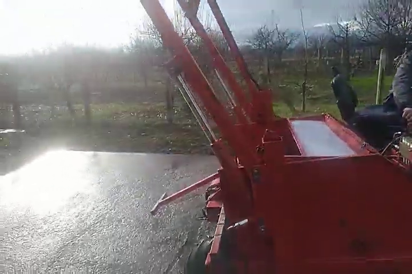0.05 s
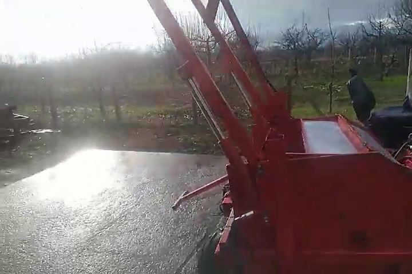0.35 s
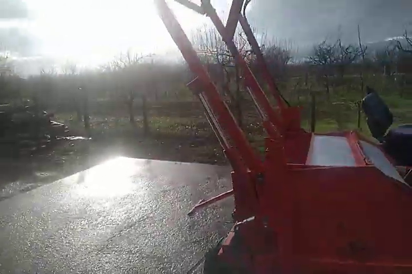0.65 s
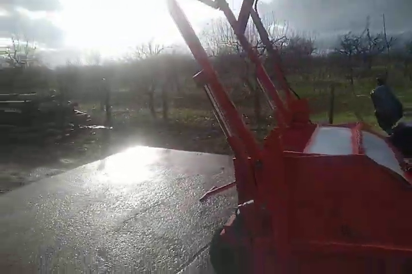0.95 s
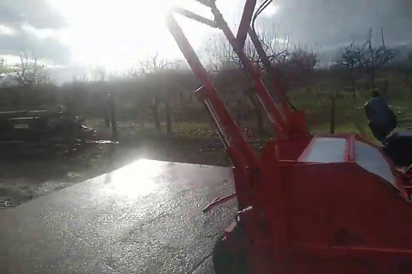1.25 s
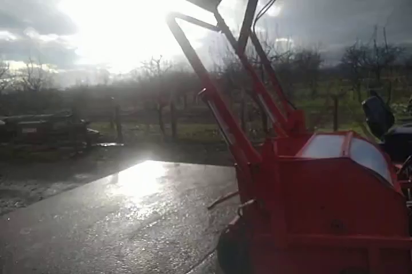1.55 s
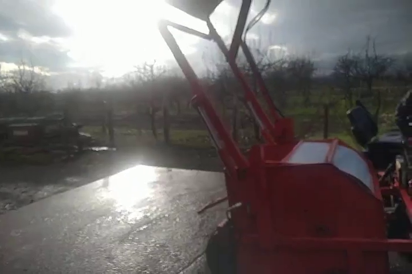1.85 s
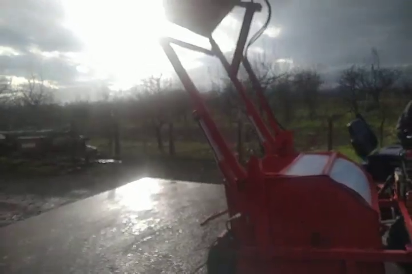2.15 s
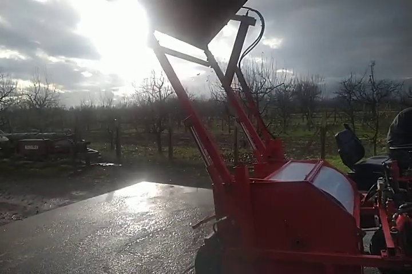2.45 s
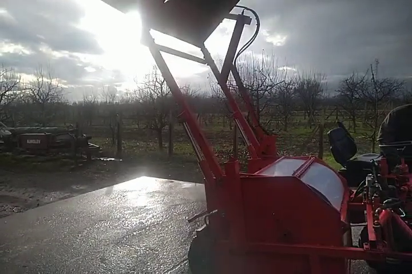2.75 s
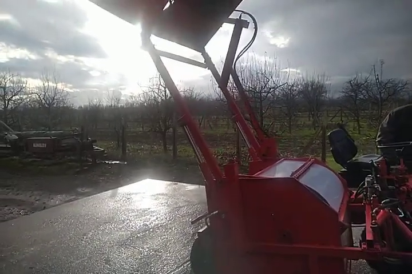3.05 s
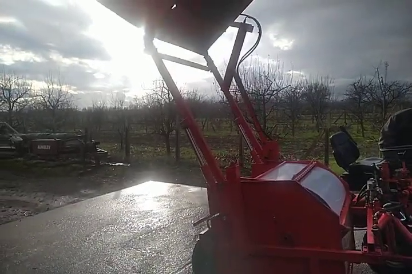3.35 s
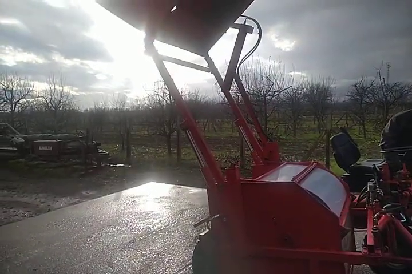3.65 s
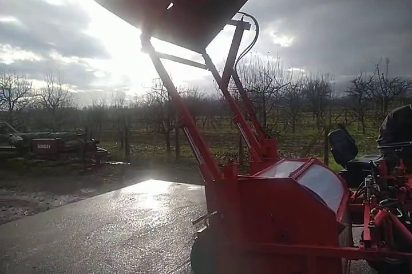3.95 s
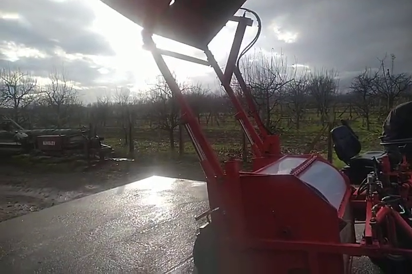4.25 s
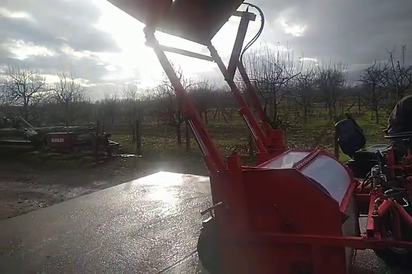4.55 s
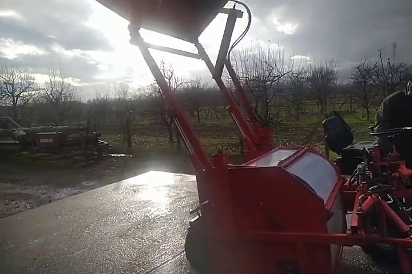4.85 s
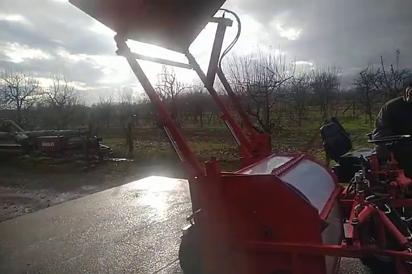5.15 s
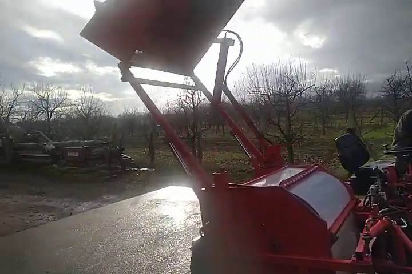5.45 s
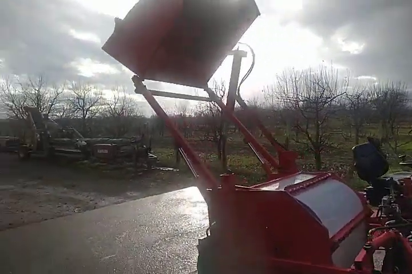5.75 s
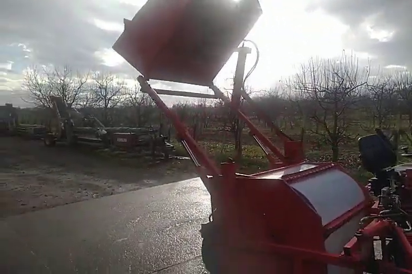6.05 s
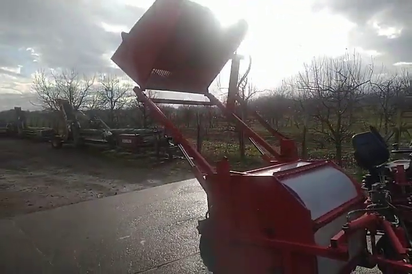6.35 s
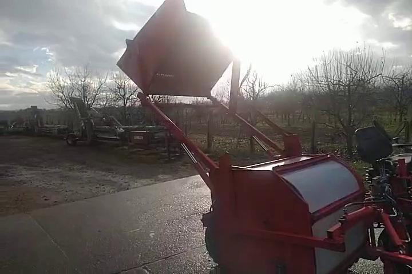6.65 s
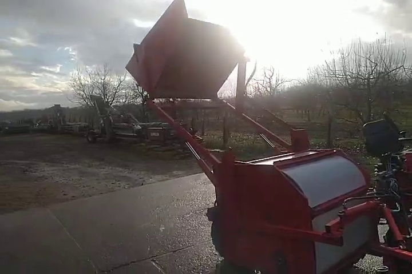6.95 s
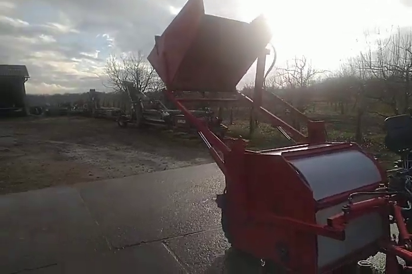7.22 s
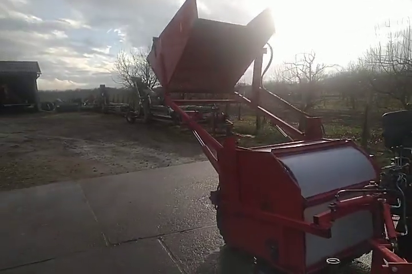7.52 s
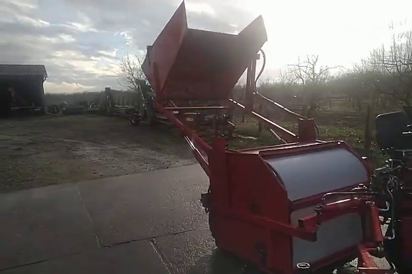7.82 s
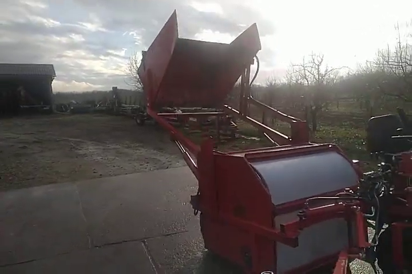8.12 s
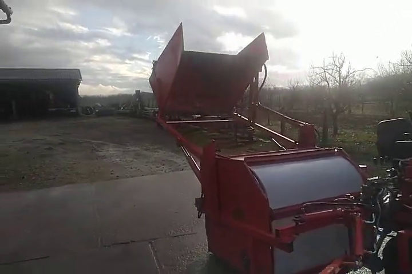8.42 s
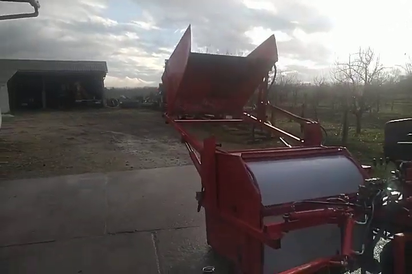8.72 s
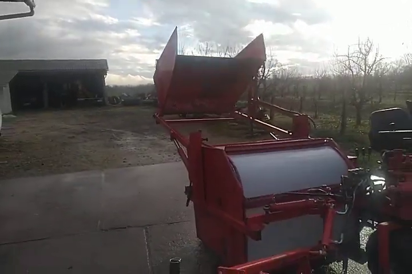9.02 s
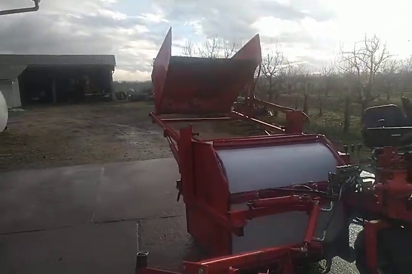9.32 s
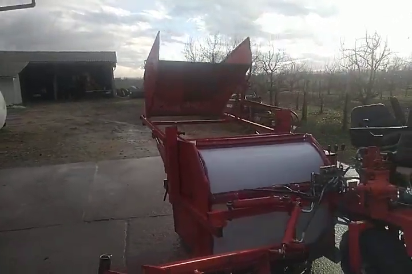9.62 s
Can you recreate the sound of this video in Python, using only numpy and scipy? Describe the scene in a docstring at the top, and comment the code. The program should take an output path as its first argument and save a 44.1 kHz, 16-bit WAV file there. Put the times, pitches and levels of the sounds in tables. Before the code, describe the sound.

A diesel farm machine runs close by on an open concrete yard for the whole ten seconds, heard on a slow walk around it. The exhaust gives a low, even throb. Over it the sheet-metal housing drones, clatters and rings from engine knocks and the brush roller, and a conveyor chain rattles densely. A faint, ragged hydraulic whine swells and fades above a thin, high hiss of oil. At about 3 seconds a few short, hissy spurts come from the valves, the engine sags slightly and the whine grows louder; the speed recovers by 4 seconds. Light wind rumbles on the microphone from about 3.5 seconds, most clearly between 5.5 and 7 seconds and more on the right. The engine tone shifts gently as the listener moves. From about 9.3 seconds another high oil hiss swells while the machine keeps running.

```python
"""A diesel pickup machine runs on a concrete yard and lowers its hopper, heard on a slow walk round it.
The exhaust throbs with two strong puffs in each engine cycle. Engine knocks and the brush roller shake
the sheet-metal housing, and the conveyor chain rattles. The hydraulic pump whines, and oil hisses and
spurts in the valves. Now and then a light gust rumbles on the left and right microphones."""
import sys
import numpy as np
from scipy import signal
from scipy.fft import rfft, irfft
from scipy.io import wavfile
from scipy.ndimage import uniform_filter1d

SR = 44100
rng = np.random.default_rng(int(sys.argv[2]) if len(sys.argv) > 2 else 0)


def wav_out(sig):
    """Save sig, one row per channel (or a flat mono array), as 16-bit PCM at SR to the path in sys.argv[1]."""
    wavfile.write(sys.argv[1], SR, np.round(np.clip(np.atleast_2d(sig).T, -1, 1) * 32767).astype(np.int16))


N = 435708
TIME = np.arange(N) / SR
FREQ = np.maximum(np.fft.rfftfreq(N, 1 / SR), 1)

# Engine speed, which sags under hydraulic load. Each row: time in seconds, engine cycles per second.
ENGINE_SPEED = [(0.0, 19.304), (0.1, 19.144), (0.3, 19.299), (0.5, 19.155), (1.1, 19.423), (1.2, 19.37),
                (1.9, 19.644), (2.4, 19.44), (2.6, 19.078), (2.9, 19.22), (3.2, 18.506), (3.3, 18.57),
                (3.6, 19.243), (3.9, 19.597), (4.9, 19.624), (5.1, 19.358), (5.7, 19.232), (6.0, 19.294),
                (6.3, 19.225), (6.8, 19.363), (7.2, 19.757), (7.5, 19.441), (7.7, 19.386), (8.1, 19.532),
                (8.5, 19.496), (8.7, 19.411), (9.4, 19.236), (9.88, 19.314)]
# The exhaust's tones. Each row: multiple of the engine speed, starting level in dB, fade in dB per second.
EXHAUST_TONES = [(2, -57, 1), (3, -48.5, -0.2), (4, -45, 1), (5, -28.5, 0.16), (6, -26.5, 0.11),
                 (7, -40.5, 0), (8, -31, 0), (9, -30, 0.83), (11, -36, 0.3), (12, -35.5, 1.3),
                 (13, -34.5, 3), (14, -59, 8), (16, -47.5, 0.5), (17, -50, 1.5), (19, -57, -0.8),
                 (21, -52.5, 0.54)]
# Spots on the walk where echoes from the yard weaken one tone.
# Each row: multiple of the engine speed, middle in seconds, half-length in seconds, depth in dB.
QUIET_SPOTS = [(6, 0.22, 1.5, 4), (8, 0.59, 0.95, 4.5), (9, 1.76, 0.54, 5), (5, 3.23, 0.4, 7.5),
               (7, 3.8, 0.94, 3.5), (5, 4.7, 2.16, 3), (13, 6.6, 0.64, 2), (11, 6.26, 1.55, 10),
               (12, 8.6, 0.51, 3.5), (8, 8.35, 0.92, 5.5), (6, 8.36, 1.03, 11.5), (5, 10.54, 0.74, 8),
               (9, 10.2, 0.46, 5)]
# The second puff's pull on the tones' timing. Each row: time in seconds, weight (the first puff is 1).
SECOND_PUFF = [(0, .2), (3, .98), (7, .95), (8.8, .07), (9.88, 0)]
# Resonances of the silencer and tailpipe. Each row: pitch in Hz, width in Hz, relative strength.
PIPE_MODES = [(94, 20, 1), (157, 8, .17), (231.4, 8, 3)]
# The phone's body shields its right microphone from the higher exhaust tones.
# Each row: multiple of the engine speed, left level minus right level in dB.
SHADE = [(6, 0.5), (9, 3.5), (12, 3.5), (16, 8.5)]
# The housing's low drone. Each row: frequency in Hz, then left and right relative levels in dB.
DRONE_COLOUR = [(20, -82, -80), (33, -75, -80), (44.3, -72, -60), (75.4, -55, -55.5), (139, -57.5, -74),
                (204, -59.5, -58), (296, -61, -65.5), (396, -62.5, -74), (509, -70.5, -77),
                (820, -150, -153)]
# The housing's brighter clatter. Each row: frequency in Hz, then left and right relative levels in dB.
CLATTER_COLOUR = [(294, -82, -88), (479, -67.5, -68), (534, -62.5, -65), (730, -62, -65.5),
                  (800, -61.5, -73), (875, -63, -66.5), (1000, -64, -79), (1130, -66, -71),
                  (1297, -71, -75.5), (1610, -80, -79.5), (2500, -105, -105)]
# Knocks of burning fuel. Each row: place in the cycle from 0 to 1, level in dB against the steady shaking.
FIRING_KNOCKS = [(0.19, -5), (.36, -8), (.56, -15), (0.82, -15)]
# The notes of the steel panels. Each row: pitch in Hz, width in Hz, relative level in dB.
PANEL_MODES = [(306.3, 69, -53), (411, 20.5, -58.5), (452.6, 16, -63), (640.5, 50, -56.5), (775, 26, -53),
               (858, 37, -51), (926.6, 31, -52), (980.6, 45, -50.5), (1088, 27, -53.5), (1155, 28, -58.5)]
# How the panels and the pump's main whine vary along the walk. Each row: time in seconds, gain in dB.
WALK_LEVEL = [(0, -0.5), (1.5, 1.5), (2.2, 0.5), (2.8, -1), (3.5, -3), (4.2, 4.5), (5.6, 0), (8.3, 4),
              (9.88, -0.5)]
# Brief ringing swells: low ones from the panels, those near 1830 and 2250 Hz the pump's higher whine.
# Each row: middle in seconds, half-length in seconds, pitch in Hz, width in Hz, relative level in dB.
RINGING_SWELLS = [(0.747, 0.28, 309, 70, -42), (.9, 0.97, 830, 170, -46.5), (1.112, 1.3, 1410, 200, -55),
                  (.9, 1.5, 2830, 240, -55.5), (.4, 0.77, 1855, 70, -55), (2.1, 0.49, 1835, 70, -57),
                  (3.05, .17, 2210, 90, -58), (3.8, .2, 1835, 70, -55), (4.1, 1, 493, 70, -50.5),
                  (4.15, 0.66, 3000, 600, -55), (5.2, .2, 870, 50, -50), (5.75, 0.85, 373, 110, -43),
                  (6.15, .33, 1817, 60, -52), (6.9, .7, 1730, 120, -53), (9.002, .14, 2275, 60, -55),
                  (9.42, .18, 2270, 60, -52)]
# The chain's rattle. Each row: frequency in Hz, then left and right relative levels in dB.
CHAIN_COLOUR = [(920, -99, -100), (1310, -73, -76.5), (1530, -76, -81), (1700, -71.5, -80),
                (1900, -74, -81), (2110, -71.5, -79.5), (2650, -75, -80.5), (2830, -75.5, -78),
                (3810, -81.5, -78.5), (4030, -87, -83), (5500, -110, -110)]
# The notes of the conveyor's guard. Each row: pitch in Hz, width in Hz, relative starting level in dB.
GUARD_MODES = [(1734, 100, -63.5), (1940, 50, -67), (2070, 66, -67), (2253, 100, -66)]
# The oil's hiss. Each row: frequency in Hz, then left and right relative levels in dB.
HISS_COLOUR = [(3000, -105, -100), (4120, -99, -94.5), (4240, -90.5, -80.5), (5110, -86, -78),
               (5700, -84.5, -75.5), (6280, -89, -78.5), (7090, -81, -83.5), (7640, -93, -89.5),
               (8560, -86.5, -99), (9170, -87.5, -100), (10260, -103, -104), (11500, -113, -113),
               (14400, -106, -106), (14800, -116, -107)]
# How the hiss varies along the walk; the chain partly follows. Each row: time in seconds, gain in dB.
TREBLE_LEVEL = [(0, 0.1), (2.3, -0.5), (3.6, -0.9), (4.5, .3), (5.2, -2), (8.2, .7), (9.88, 1)]
# Brief dips in that level. Each row: middle in seconds, half-length in seconds, depth in dB.
TREBLE_DIPS = [(2.63, 0.21, 2.5), (3.42, 0.11, 1), (5.792, 0.087, 2)]
# Spells when the pump also sings higher.
# Each row: middle in seconds, half-length in seconds, multiple of the whine's pitch, relative level in dB.
PUMP_SPELLS = [(0.793, 0.55, 2, -58), (1.75, 0.3, 2, -62), (2.0, 0.65, 1.5, -67), (2.35, .2, 2, -58),
               (3.3, 0.5, 2.5, -65), (3.85, 0.32, 2, -59), (4.528, .14, 2, -57), (6.2, 0.5, 2, -62),
               (9.4, .55, 2.5, -65)]
# Spurts of oil. Each row: middle in seconds, half-length in seconds, level on the right in dB.
SPURTS = [(2.94, .06, -44.5), (3.06, .05, -46), (3.15, .04, -49), (3.2, .028, -45), (9.7, 0.41, -51)]
# The spurts' high, thin sound. Each row: frequency in Hz, relative level in dB.
SPURT_COLOUR = [(4000, -32), (5200, -12), (5550, 8), (6300, 1), (7000, -2), (7700, -22), (12000, -32)]
# Gusts of wind. Each row: middle in seconds, half-length in seconds, left level in dB, right level in dB.
GUSTS = [(3.6, 0.07, -37, -38), (4.55, 0.09, -43, -40), (4.89, 0.04, -34, -36), (5.68, 0.05, -39, -24),
         (5.81, 0.055, -41, -20.5), (6.067, 0.025, -34, -28), (6.473, 0.046, -46, -32),
         (6.66, 0.06, -44, -32), (6.84, 0.065, -31, -27), (6.5, 1.2, -39, -37)]
# The gusts' low rumble. Each row: frequency in Hz, relative level in dB.
GUST_COLOUR = [(20, -28), (55, 6.5), (110, 6.5), (250, -6.5), (700, -23.5), (3000, -59), (12000, -101)]
# How alike the two microphones sound. Each row: frequency in Hz, likeness from 0 (unrelated) to 1.
LIKENESS = [(30, 0), (100, 0), (300, 0.91), (650, 1), (1100, 0.75), (2000, 0.18), (5000, 0), (15000, 0.44)]

PUFF_PLACES = (.375, .749)  # where the two puffs fall in the cycle, from 0 to 1
PAN_DB = np.array([[2.75], [-2.75]])  # left, then right, for the panels and the swells


def undb(db):
    """Turn decibels into a number to multiply by."""
    return 10 ** (np.asarray(db) / 20)


def unit(x):
    """Scale a signal so its average strength (rms) is 1."""
    return x / np.sqrt(np.mean(x ** 2))


def curve(table):
    """Join a table's points with straight lines over time."""
    return np.interp(TIME, *np.transpose(table))


def spectra(table):
    """Join each column's points with straight lines over log frequency."""
    hz, *columns = np.transpose(table)
    return np.array([np.interp(np.log(FREQ), np.log(hz), c) for c in columns])


def wander(rate):
    """A random drift of size about 1, with `rate` new values a second."""
    return unit(np.interp(TIME * rate, np.arange(4096), rng.standard_normal(4096)))


def bump(s, half_s):
    """A smooth rise and fall around second `s`."""
    return np.exp(-((TIME - s) / half_s) ** 2)


def surge(cycle, depth_db, place, repeats):
    """A swing in level that comes `repeats` times in each engine cycle."""
    return undb(depth_db * np.cos(2 * np.pi * repeats * (cycle - place)))


def resonance(hz, width_hz):
    """A filter that rings at one pitch and keeps white noise equally strong."""
    return np.sqrt(2 * SR / (np.pi * width_hz)) / (1 + 2j * (FREQ - hz) / width_hz) ** 2


def noise(response):
    """Separate left and right noise, shaped by a filter."""
    return irfft(rfft(rng.standard_normal((2, N))) * response, N)


def microphones(pair, left_lag_s=0.00023):
    """Blend two signals into left and right spectra; the machine stands to the right."""
    a, b = rfft(pair)
    alike = np.clip(spectra(LIKENESS)[0], 0, 1)
    left = a * np.exp(-2j * np.pi * FREQ * left_lag_s)
    right = alike * a + np.sqrt(1 - alike ** 2) * b
    return np.array([left, right])


def radiate(pair, colour):
    """Give two signals a tone colour, as heard at the microphones."""
    return irfft(microphones(pair) * undb(spectra(colour)) * np.sqrt(SR / 2), N)


def ring_metal(blows, modes):
    """Struck metal rings at its own pitches, whatever the engine speed."""
    response = sum(undb(db) * resonance(hz, width_hz) for hz, width_hz, db in modes)
    return irfft(microphones(blows) * response, N)


def ring_out(blows, fade_s):
    """Give each blow the noisy tail of steel, falling 60 dB in `fade_s`."""
    t = TIME[:8192]
    tail = rng.standard_normal(len(t)) * undb(-60 * t / fade_s)
    return unit(signal.fftconvolve(blows, tail)[:N])


def taps(times, sizes):
    """Clicks at the given times in seconds."""
    at = np.clip(times * SR, 0, N - 1).astype(int)
    return unit(np.bincount(at, sizes * (times > 0) * (at < N - 1), N))


def knocks(cycle, count, jitter_s, scatter_db):
    """Moving parts strike at `count` set places in each cycle; which ones stand out slowly drifts."""
    places = np.arange(int(cycle[-1]) + 1)[:, None] + rng.random(count)
    sizes = uniform_filter1d(rng.standard_normal(places.shape), size=30, axis=0)
    sizes /= np.sqrt(np.mean(sizes ** 2, axis=1, keepdims=True))
    times = np.interp(places, cycle, TIME) + jitter_s * rng.standard_normal(places.shape)
    sizes *= undb(scatter_db * rng.standard_normal(places.shape))
    return taps(times.ravel(), sizes.ravel())


def rattle(count, scatter_db):
    """Loose parts tap `count` times at random, a few much harder than the rest."""
    when, direction, force = rng.random((count, 3)).T
    sizes = np.sign(direction - .5) * undb(-scatter_db * np.log(1 - force))
    return taps(when * N / SR, sizes)


def pipe_phase(hz):
    """The silencer and tailpipe hold back tones near their resonances, so each puff rings on."""
    response = sum(gain / (1 + 2j * (hz - mode_hz) / width_hz) for mode_hz, width_hz, gain in PIPE_MODES)
    return np.angle(-response)


def exhaust(cycle):
    """Two unevenly spaced puffs make a throbbing stack of tones; echoes weaken one, then another."""
    second_weight = curve(SECOND_PUFF)
    crank = cycle + 0.002 * wander(30)
    mean_speed = cycle[-1] / TIME[-1]
    sound = np.zeros((2, N))
    for multiple, start_db, fade in EXHAUST_TONES:
        k = round(multiple)
        dips_db = sum(db * bump(s, half_s) for tone, s, half_s, db in QUIET_SPOTS if round(tone) == k)
        level_db = start_db - fade * TIME - dips_db
        first, second = np.exp(-2j * np.pi * k * np.array(PUFF_PLACES))
        phase = np.angle(first + second_weight * second) + pipe_phase(k * mean_speed)
        pan_db = np.interp(k, *np.transpose(SHADE)) * np.array([[.5], [-.5]])
        sound += undb(level_db + pan_db) * np.cos(2 * np.pi * k * crank + phase)
    return np.sqrt(2) * undb(0.17 * wander(40)) * sound


def firing(cycle, decay_cycles=0.042, scatter_db=4):
    """How hard the engine shakes: each knock of burning fuel jolts it and dies away, no two alike."""
    scatter = undb(scatter_db * rng.standard_normal((len(FIRING_KNOCKS), int(cycle[-1]) + 3)))
    jolts = 0
    for (place, db), sizes in zip(FIRING_KNOCKS, scatter):
        since, turn = np.modf(cycle + 1 - place)
        jolts = jolts + undb(db) * sizes[turn.astype(int)] * np.exp(-since / decay_cycles)
    return unit(1 + jolts)


def housing(cycle, drone_db, clatter_db):
    """Engine knocks and the brush roller's prongs make the sheet metal drone, clatter and ring."""
    jolts = firing(cycle)
    shaking = np.array([rattle(count=14000, scatter_db=1.5) for _ in range(2)]) * jolts
    blows = np.array([knocks(cycle, count=110, jitter_s=.00005, scatter_db=0) for _ in range(2)])
    prongs = np.array([rattle(count=30000, scatter_db=2) for _ in range(2)])
    strikes = unit((undb(-0.5) * blows + prongs) * jolts)
    drone = radiate(shaking, DRONE_COLOUR) * undb(drone_db)
    clatter = radiate(strikes, CLATTER_COLOUR) * undb(clatter_db)
    panels = ring_metal(shaking, PANEL_MODES) * undb(curve(WALK_LEVEL) + PAN_DB)
    return drone + clatter + panels


def ringing_swells(cycle):
    """Narrow bands of pulsing noise swell and fade: low panel notes and the pump's higher whine."""
    pulsing = microphones(rng.standard_normal((2, N)) * firing(cycle))
    sound = sum(irfft(pulsing * resonance(hz, width_hz), N) * undb(db) * bump(s, half_s)
                for s, half_s, hz, width_hz, db in RINGING_SWELLS)
    return sound * undb(PAN_DB)


def conveyor(cycle, gain_db):
    """Chain links tick over toothed wheels and loose slats tap, in a dense, ringing rattle."""
    links = np.array([ring_out(knocks(cycle, count=40, jitter_s=.0003, scatter_db=4), fade_s=0.17)
                      for _ in range(2)])
    slats = np.array([rattle(count=70000, scatter_db=1.44) for _ in range(2)])
    chain = radiate(unit(undb(-1.5) * links + slats), CHAIN_COLOUR)
    return chain * undb(gain_db + 0.25 * wander(35))


def conveyor_guard(rise_db_per_s=0.34):
    """Slats tap the thin guard, which rings louder as the listener comes round to it."""
    slats = np.array([rattle(count=2500, scatter_db=3) for _ in range(2)])
    return ring_metal(slats, GUARD_MODES) * undb(rise_db_per_s * TIME + np.array([[3], [-3]]))


def oil_hiss(cycle, gain_db):
    """Oil hisses through the valves, pulsing slightly as the engine turns."""
    pulse = surge(cycle, depth_db=0.46, place=0.36, repeats=2)
    pulse *= surge(cycle, depth_db=0.7, place=0.21, repeats=3)
    flow = rng.standard_normal((2, N)) * pulse * undb(0.85 * wander(45))
    return radiate(flow, HISS_COLOUR) * undb(gain_db)


def valve_ring(fade_db_per_s=1.5):
    """Flowing oil makes the valve block ring thinly, mostly on the right, fading along the walk."""
    ringing = noise(resonance(hz=5530, width_hz=240))
    level_db = -50.5 - fade_db_per_s * TIME + 1.5 * wander(6.2)
    return ringing * undb(level_db + np.array([[-6], [0]]))


def pump(cycle, speed, teeth_per_cycle=47.3, labour_below_hz=18.76, lag_s=0.1):
    """The pump's gear teeth whine raggedly, louder just after the engine slows under load."""
    sag_hz = np.maximum(labour_below_hz - np.interp(TIME - lag_s, TIME, speed), 0)
    whine_db = -48.5 - 1.2 * TIME + 54 * sag_hz + curve(WALK_LEVEL)
    phase = 2 * np.pi * teeth_per_cycle * cycle
    whine = undb(whine_db + 2.7 * wander(40)) * np.sin(phase + 0.88 * wander(40))
    pulse = surge(cycle, depth_db=1, place=.3, repeats=1)
    for multiple in (1.5, 2, 2.5):  # higher tones, faint outside their spells
        gain = undb(-68) + sum(undb(db) * bump(s, half_s) for s, half_s, tone, db in PUMP_SPELLS
                               if round(2 * tone) == 2 * multiple)
        flicker = undb(2 * wander(110))
        whine += gain * pulse * flicker * np.sin(multiple * phase + 0.86 * wander(60))
    return np.sqrt(2) * whine * undb([[2.1], [-3.2]])


def oil_spurts():
    """A few high, gritty jets of oil squirt through the valves."""
    jet = unit(noise(undb(spectra(SPURT_COLOUR))))
    opening = sum(undb(db) * bump(s, half_s) for s, half_s, db in SPURTS)
    grit_db = 2.7 * wander(260)
    return jet * opening * undb(grit_db + np.array([[-5], [0]]))


def wind():
    """Swirls of air rumble on each microphone separately."""
    rumble = unit(noise(undb(spectra(GUST_COLOUR))))
    return rumble * sum(undb([[left], [right]]) * bump(s, half_s) for s, half_s, left, right in GUSTS)


def scene():
    """One engine drives every moving part; the housing's drone fades a little along the walk."""
    speed = curve(ENGINE_SPEED)
    cycle = np.cumsum(speed) / SR  # engine cycles counted so far
    drone_db = 1.96 - 0.2 * TIME - 0.14 * wander(8.1)
    clatter_db = -2.88 - 0.04 * TIME + 0.84 * wander(8)
    treble_db = curve(TREBLE_LEVEL) - sum(db * bump(s, half_s) for s, half_s, db in TREBLE_DIPS)
    mix = exhaust(cycle) + housing(cycle, drone_db, clatter_db) + ringing_swells(cycle)
    mix += conveyor(cycle, gain_db=-1.32 + 0.55 * treble_db) + conveyor_guard()
    mix += oil_hiss(cycle, gain_db=-1.04 + treble_db) + oil_spurts() + pump(cycle, speed)
    return mix + wind() + valve_ring()


def record(dry, notch_hz=8030, top_hz=15200):
    """The microphone openings cut a narrow notch in the treble; the phone drops the very top."""
    notch = undb(-13 * np.exp(-((FREQ - notch_hz) / 170) ** 2))
    lowpass = signal.ellip(8, .2, 70, top_hz, fs=SR, output="sos")
    return signal.sosfilt(lowpass, irfft(rfft(dry) * notch, N))


dry = scene()
out = record(dry)
wav_out(out)
```